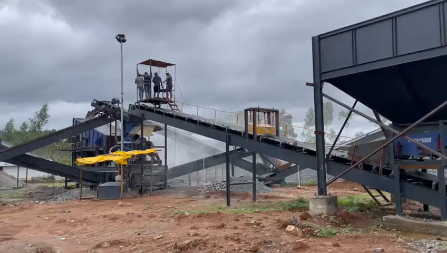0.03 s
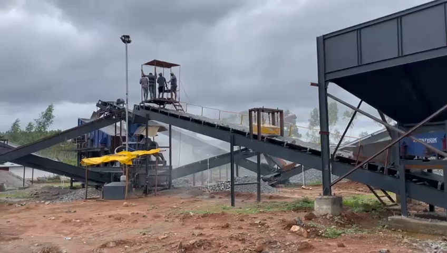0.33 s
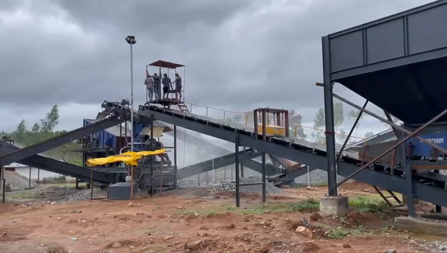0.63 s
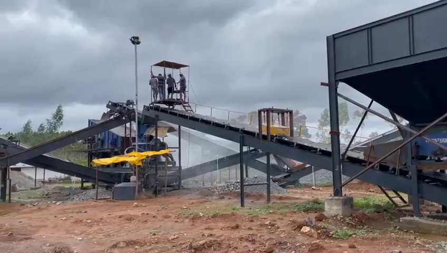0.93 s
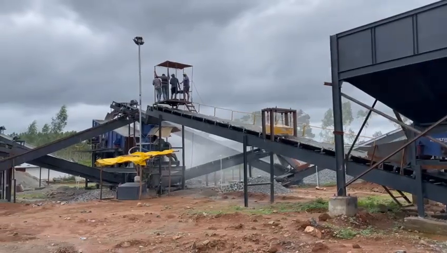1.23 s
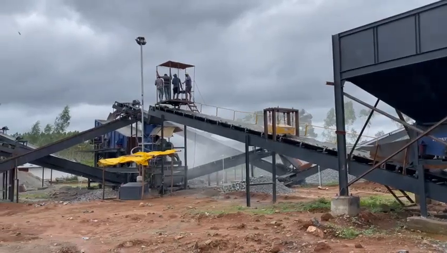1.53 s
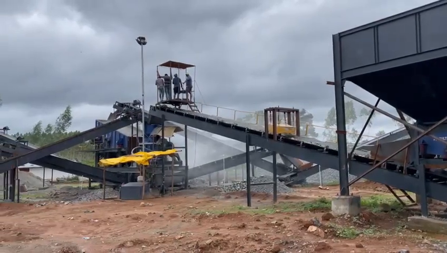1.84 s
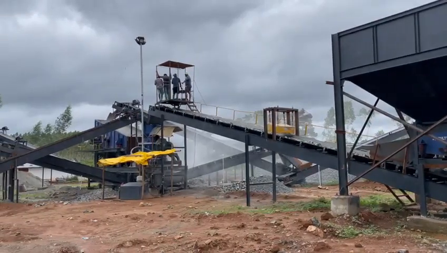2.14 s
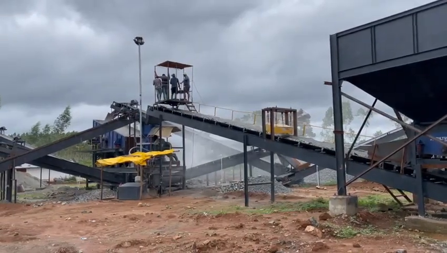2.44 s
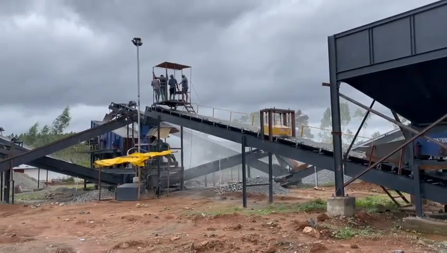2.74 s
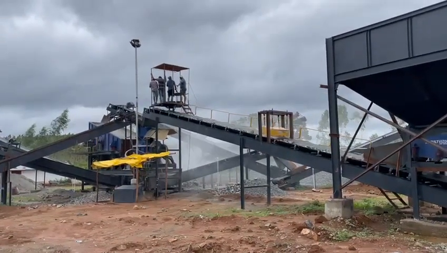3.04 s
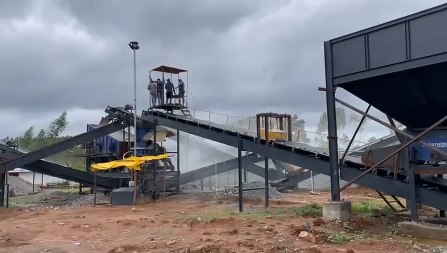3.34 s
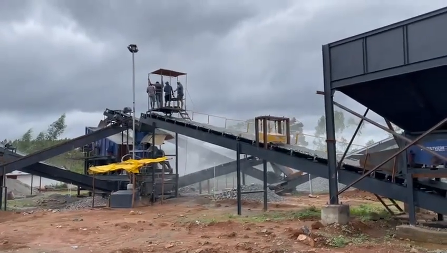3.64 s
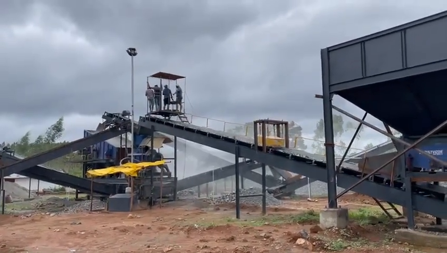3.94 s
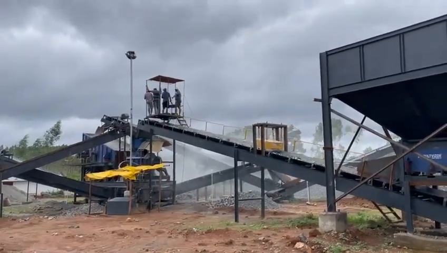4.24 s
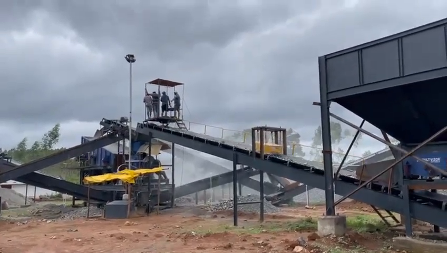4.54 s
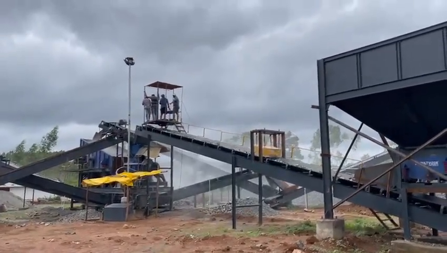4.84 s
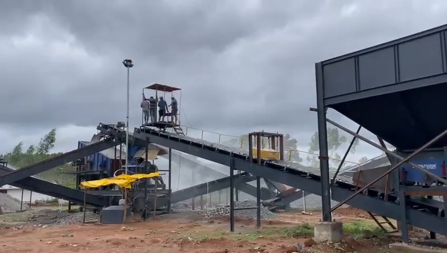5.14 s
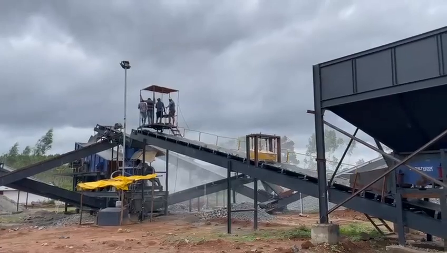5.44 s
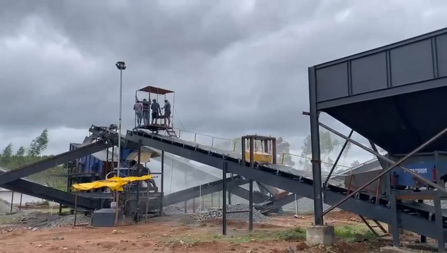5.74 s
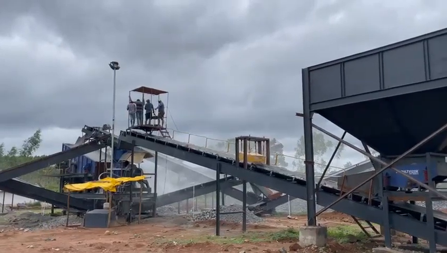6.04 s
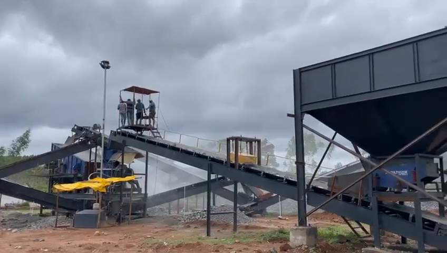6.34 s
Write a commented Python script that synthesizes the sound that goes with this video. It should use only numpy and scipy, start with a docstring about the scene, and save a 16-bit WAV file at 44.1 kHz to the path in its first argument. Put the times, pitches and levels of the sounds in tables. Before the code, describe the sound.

Steady outdoor roar of a rock crusher grinding and thudding while crushed stone pours over ringing steel, with light wind gusts.

```python
"""An open quarry, with a stone crushing plant some way off from a hand-held stereo microphone.
Crushed rock pours over a shaking steel screen and rings its deck and chutes under jets of water.
Behind it the crusher rumbles and grinds, with dull thuds. Close up, light gusts of wind buffet the
microphone, and a faint hiss flickers in the top treble."""
import sys
import numpy as np
from scipy import signal
from scipy.fft import rfft, irfft
from scipy.io import wavfile
from scipy.ndimage import uniform_filter1d

SR = 44100
rng = np.random.default_rng(int(sys.argv[2]) if len(sys.argv) > 2 else 0)


def generate_wav(sig):
    """Save sig (samples, or channels by samples) to the path in sys.argv[1] as 16-bit PCM at SR."""
    pcm = np.round(np.clip(np.atleast_2d(sig).T, -1, 1) * 32767).astype(np.int16)
    wavfile.write(sys.argv[1], SR, pcm)


N = 281358
TIME, HZ = np.arange(N) / SR, np.maximum(np.arange(N // 2 + 1) * SR / N, 1)


def from_db(db):
    """Decibels to gain."""
    return 10 ** (np.asarray(db) / 20)


def unit_power(x):
    """Scale to a mean square of 1."""
    return x / np.sqrt(np.mean(x ** 2) + 1e-20)


def over_time(curve):
    """A (time, value) curve at every sample."""
    return np.interp(TIME, *np.transpose(curve))


def over_hz(hz, values):
    """Join points on a log-frequency axis."""
    return np.interp(np.log(HZ), np.log(hz), values)


def coloured(x, spectrum):
    """Give a steady sound a spectrum, at unit power."""
    gain = from_db(over_hz(*np.transpose(spectrum)))
    return unit_power(irfft(rfft(x) * gain, N))


def drift(rate_hz, step=40, settle=2000):
    """Smooth random wandering with spread 1."""
    pole = np.exp(-2 * np.pi * rate_hz * step / SR)
    noise = rng.standard_normal(N // step + settle + 2)
    slow = signal.lfilter([1], [1, -2 * pole, pole ** 2], noise)[settle:]
    return np.interp(np.arange(N) / step, np.arange(len(slow)), unit_power(slow))


def flutter(rate_hz):
    """Quick random wobble with spread 1 and no lasting swells."""
    wobble = drift(rate_hz)
    return unit_power(wobble - uniform_filter1d(wobble, SR // 8))


def steadied(x, span_s=0.09):
    """Even out the power of a random sound, keeping its finer grain."""
    power = uniform_filter1d(x ** 2, int(span_s * SR))
    return x / np.sqrt(np.maximum(power, 0) + 1e-3)


def swells(rows):
    """Gain of smooth rises and falls; overlapping ones add in power."""
    power = 0
    for peak_s, length_s, db in rows:
        position = np.clip((TIME - peak_s) / length_s, -.5, .5)
        power += (from_db(db) * np.cos(np.pi * position)) ** 2
    return np.sqrt(power)


def closing_fade(start_s=6.227, db_per_s=94):
    """Gain that lets the low roar drop away at the end."""
    return from_db(-db_per_s * np.maximum(TIME - start_s, 0))


def resonate(x, hz, width_hz):
    """One resonance with gain 1 at its peak."""
    r = np.exp(-np.pi * width_hz / SR)
    feedback = [1, -2 * r * np.cos(2 * np.pi * hz / SR), r * r]
    return signal.lfilter(np.array([1, 0, -1]) * (1 - r * r) / 2, feedback, x + 1e-18)


def impacts(per_s, spread_db):
    """Two unrelated showers of clicks of random size: direct and scattered sound."""
    sizes = from_db(spread_db * np.minimum(rng.exponential(1, (2, N)), 4))
    signs = rng.choice([-1, 1], (2, N))
    return sizes * signs * (rng.random((2, N)) < per_s / SR)


def clinks(per_s, band_hz=(2150, 4200), width_hz=40, spread_db=1.0, count=24):
    """Hard stones ring briefly, each size at a pitch of its own."""
    pitches = np.geomspace(*band_hz, count) * rng.uniform(.98, 1.02, count)
    clicks, size = impacts(per_s, spread_db), rng.integers(0, count, N)
    return unit_power(sum(resonate(clicks * (size == k), hz, width_hz) for k, hz in enumerate(pitches)))


# Faint hiss above the sound of the plant: (frequency [Hz], relative level [dB])
HISS_SPECTRUM = [(9000, -48), (10000, -9.5), (10700, 14), (11300, 17), (11700, -39.5)]
# Its course: (time [s], level [dB])
HISS_LEVEL = [(0.2, -56), (1.2, -54), (1.75, -54), (2.13, -49), (2.35, -56), (3.2, -54), (4.2, -53.5),
              (5.4, -55.5), (6.3, -54)]

def top_hiss(flicker_db=7):
    """A faint hiss flickers in the top treble."""
    level_db = over_time(HISS_LEVEL) + flicker_db * np.clip(drift(10), -3, 1.3)
    return coloured(rng.standard_normal((2, N)), HISS_SPECTRUM) * from_db(level_db)


# Wind right on the microphone: (frequency [Hz], relative level [dB])
WIND_SPECTRUM = [(15, -27), (25, -14), (40, -16), (55, 2), (75, -8), (110, -17), (250, -13), (600, -52.5)]
# Gusts across the open quarry: (peak time [s], length [s], relative level [dB])
GUSTS = [(0.14, 0.34, -26), (1.36, 0.22, -32), (1.76, 0.22, -28), (2.56, 0.42, -23.5), (3.45, 0.97, -30.5),
         (3.84, 0.35, -24), (4.1, 0.36, -25.5), (4.45, 0.37, -35), (4.74, 0.45, -23.5), (5.49, 0.25, -27),
         (5.95, 1, -33)]

def wind(breeze_db=-40, gust_gain_db=1.0, lumps_db=0.5):
    """Eddies push on the microphone in low lumps, a light breeze with gusts on top."""
    strength = np.hypot(from_db(breeze_db), from_db(gust_gain_db) * swells(GUSTS))
    eddies = steadied(coloured(rng.standard_normal((2, N)), WIND_SPECTRUM))
    return eddies * strength * from_db(lumps_db * flutter(28))


# Water jets over at the screen: (frequency [Hz], relative level [dB])
SPRAY_SPECTRUM = [(2500, -31), (4300, -2.5), (5200, -3), (5650, -3), (6200, 2), (7300, -6), (7700, -6),
                  (9000, -41)]
# Their wash from some way off: (time [s], level [dB])
SPRAY_LEVEL = [(0.1, -33), (0.45, -37), (1.4, -54), (2.15, -35), (2.4, -46), (3.0, -37), (3.45, -33),
               (3.6, -38.5), (5.0, -36.5), (5.5, -38.5), (5.95, -35.5), (6.38, -33)]

def spray(splash_db=3.5):
    """Jets of water patter on the rock in countless fine drops."""
    drops = coloured(impacts(per_s=20000, spread_db=2.5), SPRAY_SPECTRUM)
    return drops * from_db(over_time(SPRAY_LEVEL) + splash_db * flutter(12))


# The crusher's frame and jaws across the quarry: (frequency [Hz], relative level [dB])
RUMBLE_SPECTRUM = [(35, -47), (65, -11.5), (95, -1.5), (130, -1.5), (175, -5), (215, -9.5), (280, -16.5),
                   (700, -62.5)]
GRINDING_SPECTRUM = [(120, -9), (250, 0), (330, 1.5), (420, 0), (510, 4), (630, 3.5), (760, -5), (1000, -8),
                     (2000, -50)]
# Its rumble under load and its grinding, from some way off: (time [s], relative level [dB])
RUMBLE_LEVEL = [(0.1, -21.5), (1.3, -22), (2.05, -22), (3.2, -21.5), (4.2, -23.5), (4.93, -19), (5.06, -26),
                (5.3, -23), (5.43, -20.5), (5.6, -27.5), (6.0, -29.5), (6.38, -22)]
GRINDING_LEVEL = [(0.1, -27), (0.6, -27.5), (1.6, -29.5), (2.0, -27), (2.21, -29), (2.45, -27.5),
                  (3.0, -28.5), (3.75, -28.5), (4.05, -29), (4.6, -26), (5.2, -29), (5.55, -27.5),
                  (5.8, -27), (6.1, -30.5), (6.38, -25.5)]

def crusher(rumble_gain_db=-1.0, tumble_db=1.44, rumble_surge_db=0.53, grinding_surge_db=1.93):
    """Big rocks tumble in the heavy frame while smaller ones crack between the jaws."""
    surge = flutter(23)  # shared by frame and jaws
    rumble = steadied(coloured(impacts(per_s=1500, spread_db=2.5), RUMBLE_SPECTRUM))
    rumble *= from_db(over_time(RUMBLE_LEVEL) + rumble_gain_db)
    rumble *= from_db(tumble_db * flutter(14) + rumble_surge_db * surge)
    grinding = steadied(coloured(impacts(per_s=2400, spread_db=1.5), GRINDING_SPECTRUM))
    grinding *= from_db(over_time(GRINDING_LEVEL) + grinding_surge_db * surge)
    return (rumble + grinding) * closing_fade()


# Dull thuds from the crusher, centred at the microphone:
# (time [s], base level [dB], pitch [Hz], knock gain [dB])
THUDS = [(0.178, -8, 119, -17), (0.234, -11, 153, -23), (0.264, -8, 153, -8), (0.587, -3.5, 140, -27),
         (0.856, -5.5, 116, -12), (0.952, -3.5, 129, -18), (1.187, -4.5, 155, -32), (1.228, -9, 134, -19),
         (1.284, -5.5, 187, -17), (1.297, -7, 268, -17), (1.404, -8, 144, -26), (1.549, -10, 140, -28),
         (1.599, -4.5, 137, -32), (1.648, -8, 166, -25), (1.678, -2, 143, -15), (1.738, -2.5, 152, -26),
         (1.787, -2, 144, -18), (1.819, -3.5, 146, -15), (2.006, -9, 213, -18), (2.038, -1, 124, -26),
         (2.275, -6, 128, -21), (2.392, -13, 137, -24), (2.456, -4.5, 139, -17), (2.465, -6, 67, -12),
         (2.493, -9, 147, -17), (2.535, -9, 66, -7), (2.596, -10, 191, -16), (2.621, -11, 67, -20),
         (2.823, -3, 118, -15), (3.029, -4.5, 153, -18), (3.105, -11, 137, -19), (3.152, -5.5, 182, -12),
         (3.18, -6, 169, -13), (3.233, -6, 122, -19), (3.308, -9, 138, -20), (3.43, -8, 76, -31),
         (3.639, -1.5, 159, -29), (3.759, -22, 160, 6), (3.805, -1, 200, -7), (3.823, -5, 105, -4),
         (3.833, -7, 72.4, -25), (3.932, 1.2, 148, -16), (3.951, -3, 125, -11), (4.014, -8, 68, -19),
         (4.266, -3, 122, -17), (4.32, -4, 132, -31), (4.427, -5, 140, -24), (4.596, -8, 74, -10),
         (4.625, -6, 201, -17), (4.64, -8.5, 73, -20), (4.67, -7, 111, -18), (4.733, -4.5, 106, -8),
         (4.761, -13, 152, -2), (4.842, -6, 108, -20), (4.861, -8, 80, -12), (4.899, -5, 117, -20),
         (4.944, -16, 125, -24), (5.201, -11, 134, -28), (5.244, -7, 150, -13), (5.265, -9.5, 268, -14),
         (5.295, -3, 128, -31), (5.457, -11, 156, 0.5)]

def thuds(boom_gain_db=-8.0, knock_hz=420, knock_s=0.0014, knock_lag_s=0.0032):
    """A boom swells and dies in a few cycles, with a shorter, higher knock on its rise."""
    out = np.zeros(N)
    for start_s, db, hz, knock_gain_db in THUDS:
        boom_phase, knock_phase = rng.uniform(0, 2 * np.pi, 2)
        at = int(start_s * SR)
        t = TIME[:min(SR // 5, N - at)]
        swell_s = 0.0046 * (140 / hz) ** 0.54  # deeper booms are slower
        boom_age = t / swell_s
        boom = (boom_age / 2) ** 2 * np.exp(2 - boom_age) * np.sin(2 * np.pi * hz * t + boom_phase)
        knock_age = np.maximum(t - knock_lag_s, 0) / knock_s
        knock = knock_age * np.exp(1 - knock_age) * np.sin(2 * np.pi * knock_hz * t + knock_phase)
        out[at:at + len(t)] += from_db(db + boom_gain_db) * boom + from_db(db + knock_gain_db) * knock
    return out


def cobbles(large_db=-32.5, small_db=-36.0, pebble_db=-35.0):
    """Fist-sized rocks, smaller ones and pebbles knock about in the chutes, the smaller the higher."""
    large = clinks(per_s=170, band_hz=(329.8, 696.3), width_hz=13.5, spread_db=-0.3, count=12)
    small = clinks(per_s=130, band_hz=(971.5, 1449.6), width_hz=15, count=10)
    pebbles = clinks(per_s=300, band_hz=(2304, 5187), width_hz=22, spread_db=1.3, count=40)
    rocks = from_db(large_db) * large + from_db(small_db) * small
    return rocks * closing_fade() + from_db(pebble_db) * pebbles


# Heaps sliding down a chute at the plant: (peak time [s], length [s], base level [dB], gravel gain [dB])
SLIDES = [(1.224, 0.077, -25.5, -5), (1.85, 0.41, -34, 2.5), (2.016, 0.13, -28.5, -1),
          (4.498, 0.13, -32, -5.5), (4.66, 0.16, -26.5, -9.5), (4.88, 0.073, -28.5, -23),
          (6.01, 0.093, -32, -1), (6.18, 0.17, -26.5, -6.5)]

def slides(coarse_gain_db=3.0):
    """A sliding heap grinds coarse rock together and carries gravel with it."""
    coarse = from_db(coarse_gain_db) * coloured(impacts(per_s=2400, spread_db=3.0), GRINDING_SPECTRUM)
    gravel = coloured(impacts(per_s=2500, spread_db=-5.0), GRAVEL_SPECTRUM)
    return sum((coarse + from_db(gravel_db) * gravel) * swells([swell]) for *swell, gravel_db in SLIDES)


# Larger stones on the deck, centred at the microphone: (time [s], relative level [dB])
CLACKS = [(0.318, -23), (0.762, -22), (1.217, -21), (3.215, -13), (3.687, -20), (5.091, -18), (5.251, -35)]

def clacks(gain_db=-4.0, rise_s=0.001, ring_s=0.0057, bounce_s=0.017, bounce_db=-7.0, count=7):
    """A larger stone strikes and bounces once, ringing with a few pitches of its own."""
    out, t = np.zeros(N + SR), TIME[:SR // 8]
    envelope = np.exp(-t / ring_s) * (1 - np.exp(-t / rise_s))
    for start_s, db in CLACKS:
        pitches_hz = 1900 * (4400 / 1900) ** rng.random(count)
        ring = envelope * np.sin(2 * np.pi * np.outer(pitches_hz, t)).sum(axis=0) / np.sqrt(count)
        for lag_s, loss_db in ((0, 0), (bounce_s, bounce_db)):
            at = int((start_s + lag_s) * SR)
            out[at:at + len(t)] += from_db(db + gain_db + loss_db) * ring
    return out[:N]


# Showers of stones over at the screen: (peak time [s], length [s], relative level [dB])
RATTLES = [(0.85, 0.23, -30), (1.22, 0.17, -35.5), (1.72, 0.74, -33), (2.05, 0.3, -32.5),
           (2.63, 0.22, -30.5), (2.87, 0.2, -31), (3.28, 0.34, -29), (4.5, 0.51, -40)]

def rattles(gain_db=0.5):
    """Showers of hard stones rattle brightly on the steel deck."""
    stones = unit_power(resonate(clinks(per_s=630), hz=2550, width_hz=600))
    return stones * from_db(gain_db) * swells(RATTLES)


# Deck and chutes ringing across the quarry: (frequency [Hz], width [Hz], relative level [dB])
STEEL_MODES = [(756.6, 24, -2), (1010, 250, -1), (1317, 110, -5.5), (1860, 200, -0.5), (2142, 49, -7),
               (2273, 16, -2.1), (2377, 65, -8.5), (2837, 170, -2.5), (3364, 58, -7), (5110, 160, -12)]

def ringing_steel(steel_db=-30.5, clink_db=-36.5):
    """Stones set the steel ringing and clink as they strike it."""
    steel = sum(from_db(db) * unit_power(resonate(impacts(per_s=700, spread_db=4.5), hz, width_hz))
                for hz, width_hz, db in STEEL_MODES)
    return from_db(steel_db) * unit_power(steel) + from_db(clink_db) * clinks(per_s=240)


# Gravel and finer grit landing some way off: (frequency [Hz], relative level [dB])
GRAVEL_SPECTRUM = [(400, -21), (740, -5), (850, 0), (950, 0), (1080, -0.5), (1300, -1.5), (1490, 0.5),
                   (1650, 1), (1850, -1.5), (2030, -3.5), (2800, -5.5), (5000, -26)]
GRIT_SPECTRUM = [(1400, -21.5), (1950, -11), (2150, -3), (2450, 0.5), (2850, 0), (3500, 0), (4300, -5),
                 (5300, -4.5), (5600, -6.5), (6100, -5.5), (7300, -9), (7700, -8.5), (9000, -58)]
# The stream of rock onto the screen: (time [s], level above the usual flow [dB])
ROCK_FLOW = [(0.2, 1.6), (0.55, 0), (0.82, 0.5), (1.25, 0.5), (1.95, 1.8), (2.42, -0.2), (2.7, 0.6),
             (3.3, 0.5), (3.65, -0.2), (4.5, 0.6), (5.05, 0.5), (5.38, -0.5), (6.15, 0.4), (6.38, 0.2)]

def shaking_screen(stroke_hz=16.53, shake_db=0.4, pour_db=-28.5, flutter_db=0.87):
    """Gravel and grit pour onto the ringing deck, tossed once per stroke of the screen."""
    flow_db = over_time(ROCK_FLOW)
    toss = from_db(shake_db * np.sin(2 * np.pi * stroke_hz * TIME))
    gravel = coloured(impacts(per_s=3500, spread_db=2.0), GRAVEL_SPECTRUM)
    gravel *= from_db(pour_db + 0.93 * flow_db + flutter_db * flutter(18))
    grit = coloured(impacts(per_s=16000, spread_db=2.5), GRIT_SPECTRUM)
    grit *= from_db(pour_db + flow_db + flutter_db * flutter(20))
    return toss * (gravel + grit + ringing_steel() * from_db(flow_db) + rattles())


# Left and right channels: (frequency [Hz], likeness [0-1], phase lead of the left [rad])
CHANNEL_LIKENESS = [(60, .94, 0), (300, .93, 0), (520, .84, .25), (720, .76, 1.1), (870, .68, 2.6),
                    (960, .45, 1.0), (1080, .68, 1.2), (1220, .62, 1.75), (1450, .52, 1.3),
                    (1560, .55, 2.3), (1620, .75, 2.95), (1680, .75, -2.8), (1780, .45, -1.3),
                    (1900, .36, -.2), (2020, .35, -2.6), (2140, .6, -.7), (2270, .88, 0), (2480, .63, .95),
                    (2650, .65, .55), (3100, .66, 1.6), (3330, .6, 1.15), (3500, .62, 1.4),
                    (4000, .47, 1.05), (4650, .33, .9), (4900, .33, -.3), (5500, .5, -.6),
                    (5750, .58, -2.0), (6400, .94, -.1), (6850, .92, -.1), (7500, 1, 3.14),
                    (10000, 1, 3.14), (11400, .45, .6)]
# Their lean to one side: (frequency [Hz], left minus right [dB])
CHANNEL_BALANCE = [(300, 0), (450, -.5), (640, -4), (800, -.5), (930, 2.6), (1070, 1), (1300, 3.2),
                   (1650, .7), (2000, 1), (2280, -.7), (2650, 1.6), (2850, .4), (3150, 3.2), (3350, 2),
                   (3620, 4), (4100, 1.9), (4800, 3.8), (5200, 3.4), (6000, -.3), (6800, 0)]

def stereo_image(pair):
    """Set the channels' likeness, phase and lean; from 7.5 to 10 kHz they are opposed and sound wide."""
    direct, scattered = rfft(pair)
    hz, likeness, phase = np.transpose(CHANNEL_LIKENESS)
    coherence = over_hz(hz, np.clip(likeness, 0, .999) * np.exp(1j * phase))
    common = np.sqrt((1 + abs(coherence)) / 2) * direct
    apart = np.sqrt((1 - abs(coherence)) / 2) * scattered
    lean = from_db(over_hz(*np.transpose(CHANNEL_BALANCE)) / 2)
    left = (common + apart) * lean
    right = (common - apart) / lean * np.exp(-1j * np.angle(coherence))
    return irfft([left, right], N)


def scene():
    """The plant and the wind in stereo; thuds and clacks are alike in both channels."""
    plant = shaking_screen() + crusher() + cobbles() + slides() + spray()
    return stereo_image(plant + wind() + top_hiss()) + thuds() + clacks()


def record(dry, start_s=0.082, rise_s=0.002, cutoff_hz=11700):
    """The input opens after a moment of silence; the top treble is cut steeply."""
    opened = np.clip((TIME - start_s) / rise_s, 0, 1)
    lowpass = signal.ellip(12, .1, 90, cutoff_hz, fs=SR, output="sos")
    return signal.sosfilt(lowpass, dry * opened)


dry = scene()
out = record(dry)
generate_wav(out)
```